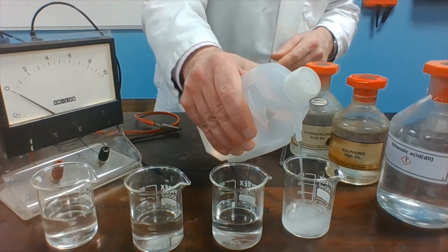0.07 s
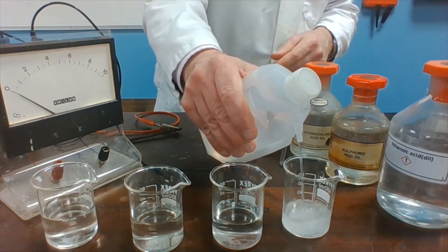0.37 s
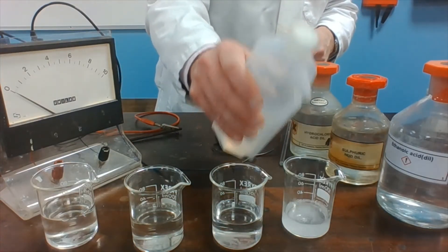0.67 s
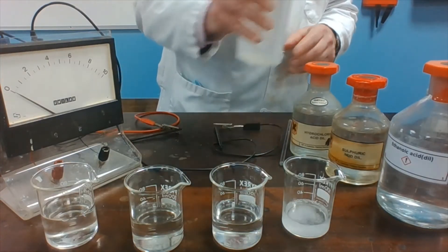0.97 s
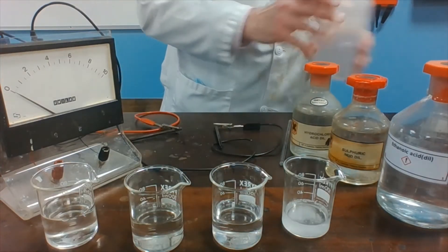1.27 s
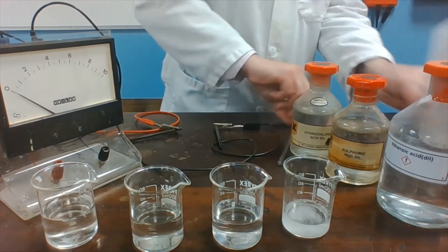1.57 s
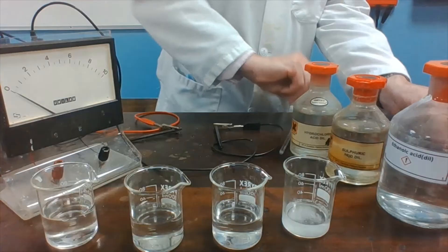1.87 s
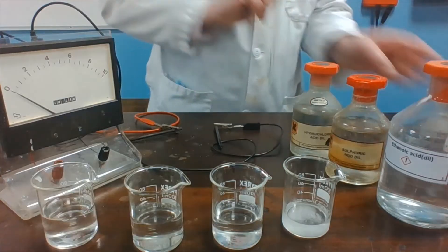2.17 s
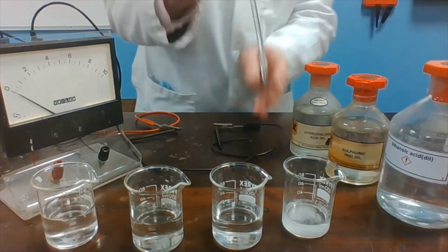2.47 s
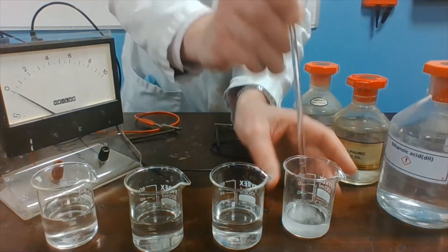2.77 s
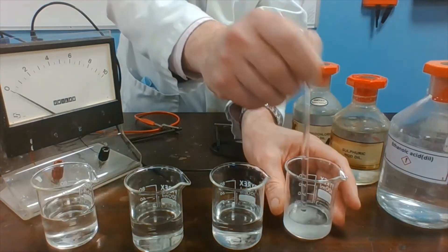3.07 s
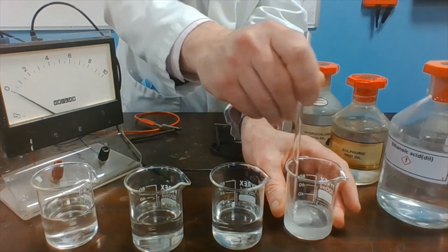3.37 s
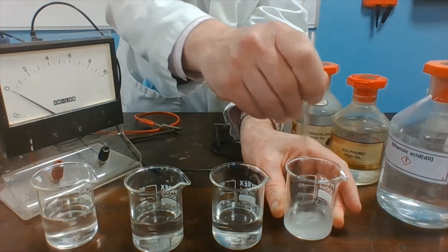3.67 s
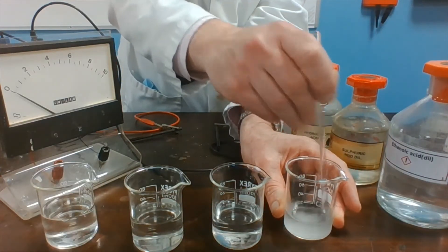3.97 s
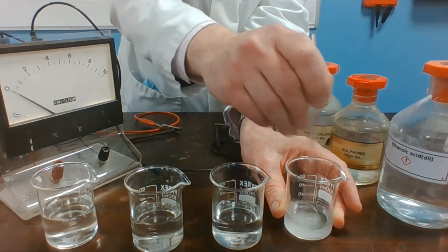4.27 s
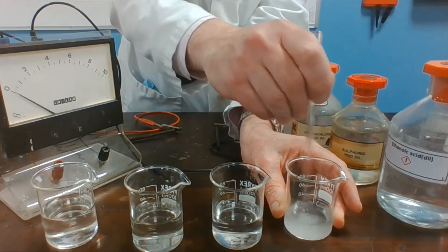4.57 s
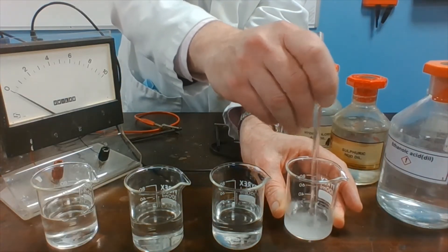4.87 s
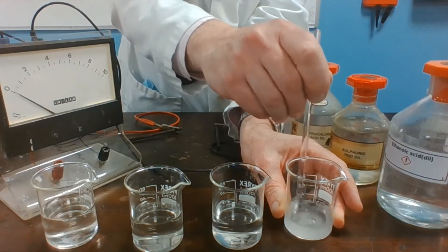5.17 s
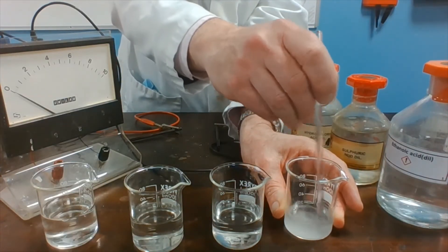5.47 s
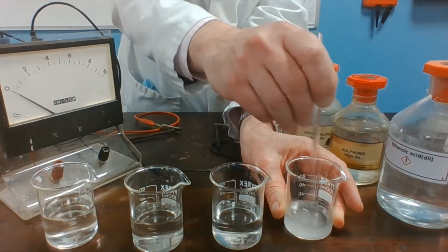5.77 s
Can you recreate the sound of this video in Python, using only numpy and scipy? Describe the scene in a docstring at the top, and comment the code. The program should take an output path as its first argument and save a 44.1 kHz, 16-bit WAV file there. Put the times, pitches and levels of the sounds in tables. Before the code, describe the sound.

A plastic bottle squirts water into a small glass beaker with a brief fizzing patter. Sleeves rustle faintly and the bottle is put down with soft bumps. After a pause, a glass rod stirs the water, scraping the bottom and clinking sharply on the wall, louder and busier toward the end, as the beaker knocks on a wooden bench. Heard close in a small, fairly dry room with a low electrical hum.

```python
"""A plastic wash bottle squirts water into a small glass beaker, then a glass rod stirs it.
The jet fizzes and drums in the glass; sleeves rustle and the bottle is put down. The rod scrapes round
the bottom and clinks on the wall, and the hand-held beaker rocks and knocks on the wooden bench.
Heard close, on one microphone, in a small, fairly dry room with an electrical hum and a thin whine."""
import sys
import numpy as np
from scipy import signal
from scipy.fft import rfft, irfft, next_fast_len
from scipy.io import wavfile
from scipy.ndimage import map_coordinates

SR = 44100
rng = np.random.default_rng(int(sys.argv[2]) if len(sys.argv) > 2 else 0)


def dump_mix(stems):
    """Bounce the given channels to the path in sys.argv[1] as a 16-bit WAV at rate SR."""
    frames = np.atleast_2d(stems).T  # one column per channel
    limited = np.clip(frames, -1, 1)  # hard clip at full scale
    pcm = np.round(limited * 32767).astype(np.int16)
    wavfile.write(sys.argv[1], SR, pcm)


N = 261072
RING_TIME = np.arange(SR // 4) / SR  # time axis of one hit
CONTACT_S = 0.007  # a hit's level is set over this opening span
TOP_HZ = 16100  # upper edge of the treble

# sudden spits of the nozzle: start_s, level_db, pitch_hz
NOZZLE_SPITS = [(0.022, -51.5, 8500), (0.134, -48.5, 9300), (0.163, -50.5, 7900), (0.262, -47.5, 8300),
                (0.353, -47, 13200)]
# fat drops striking the beaker's bottom: start_s, level_db
FAT_DROPS = [(0.079, -44.5), (0.387, -50.5), (0.47, -51.5), (.497, -60)]
# spray ringing in the beaker: frequency_hz, density_db
SPATTER_SPECTRUM = [(1900, -34), (3000, -9.5), (4100, -2), (5300, -15), (6200, -7), (7400, -4),
                    (10000, -6.5), (13200, -0.5), (15500, -2.5)]
# the jet drumming on the glass: frequency_hz, density_db
DRUMMING_SPECTRUM = [(200, -54), (520, -4), (610, -19), (720, 1), (850, -13), (1050, -5.5), (1230, 9),
                     (1450, -6), (1700, -21), (2000, -28.5), (4000, -26.5)]
# the beaker's rim: pitch_hz, gain_db, t60_s
RIM_MODES = [(5857, -4, 0.09), (7327, -1, 0.09), (12800, 2, 0.08)]
# equipment hum and whine: pitch_hz, rms_db
HUM_TONES = [(120.1, -56.5), (187.7, -56.5), (8000, -80), (10907, -87)]
# the room's air: frequency_hz, density_db
AIR_SPECTRUM = [(25, -3), (50, -10), (90, 8.5), (150, 14), (260, 0), (450, 0), (700, -8), (1000, -2.5),
                (2000, -17.5), (5000, -17), (16000, -17)]
# decay of the room's tail: frequency_hz, t60_s
ROOM_DECAY = [(150, 0.64), (1200, 0.16), (6000, 0.67), (15000, 0.041)]
# sleeves and hands moving over the bench: time_s, relative_db
RUSTLE_CURVE = [(0.6, -87), (1.45, -84), (1.56, -62.5), (1.66, -74.5), (1.78, -66.5), (2.05, -83),
                (2.9, -104)]
# rustling cloth: frequency_hz, density_db
RUSTLE_SPECTRUM = [(60, -11), (150, 13), (250, 4.5), (500, 1.5), (750, -16), (1600, -3.5), (1950, -21.5),
                   (3000, -19), (12000, -19)]
# the plastic bottle moved and put down: start_s, relative_db, pitch_hz
PLASTIC_BUMPS = [(0.593, -58, 490), (1.256, -57, 526), (1.358, -60.5, 506), (1.439, -57.5, 515),
                 (1.598, -59, 514)]
# one nudge of a glass reagent bottle: start_s, level_db
REAGENT_NUDGE = (1.595, -54.5)
# that bottle's ring: pitch_hz, gain_db, t60_s
REAGENT_MODES = [(3950, -2, 0.05), (4780, -12, 0.08), (6410, -6, 0.05), (9550, 1, 0.06), (13200, -5, 0.05)]
# the beaker's base bumping on the bench: start_s, relative_db
BASE_KNOCKS = [(2.866, -57), (3.339, -57.5), (3.418, -48.5), (3.504, -60), (3.71, -58), (4.372, -43.5),
               (4.391, -47.5), (4.413, -45), (4.59, -46), (4.642, -39.5), (4.659, -45.5), (4.832, -32.5),
               (4.857, -46.5), (4.936, -39), (5.019, -44.5), (5.264, -35.5), (5.466, -40.5), (5.505, -43.5),
               (5.572, -46), (5.598, -63), (5.731, -50), (5.8, -52)]
# the base standing on the bench top: pitch_hz, gain_db, t60_s
BASE_MODES = [(1254, -5.5, 0.035), (1312.5, -6, 0.022), (1536, -16, 0.024), (1716, -22.5, 0.031)]
# the wood under it: pitch_hz, gain_db, t60_s
WOOD_MODES = [(147.3, -0.5, 0.18), (186.5, -0.5, 0.14), (295, -2.5, 0.062), (412, 1, 0.052),
              (515, 2.5, 0.055), (692, 1.5, 0.055), (934, -0.5, 0.073)]
# the judder of the base: frequency_hz, density_db
JUDDER_SPECTRUM = [(30, -18), (150, -57), (450, 7), (820, 10.5), (1300, 1), (1750, 11.5), (1920, -23),
                   (2200, -4.5), (4000, -9.5), (9000, -6.5)]
# the hand presses down and the bench top booms: start_s, level_db, pitch_hz
BENCH_BOOMS = [(4.416, -40.5, 149), (5.071, -44.5, 145)]
# the rod on the wall, rebounds included: start_s, level_db, low_modes_db, high_over_mid_db
WALL_CLINKS = [(2.8713, -52, -14, -19), (3.1968, -37.5, -10.5, 1.5), (3.513, -45.5, -15, 6),
               (3.589, -27, -16, -4.5), (3.595, -43, -10, 4), (3.646, -41.5, -14, -3),
               (3.689, -39.5, -17, -7), (3.814, -45.5, -7, -7), (3.8812, -47.5, -40, -14),
               (3.965, -26, -22, 7), (4.1956, -27, -20, 1.5), (4.3283, -26, -43, 2),
               (4.336, -33.5, -19, -5), (4.6395, -23, -31, 1), (4.8004, -43.5, -8.5, -6),
               (4.8295, -21.5, -16, 4), (4.84, -32.5, -30, 3), (4.9321, -20.5, -29, 7.5),
               (4.9503, -29.5, -16.5, 0), (5.019, -21, -22, 6.5), (5.029, -34, -11.5, 1),
               (5.2415, -23, -25.5, 0), (5.265, -47.5, 2, 9), (5.367, -44.5, -14, 10),
               (5.381, -40, -19, -2), (5.4655, -22, -19.5, -0.5), (5.4788, -29, -20, 12),
               (5.575, -21, -23, 4.5), (5.673, -33, -8, -4), (5.7038, -33, -14.5, 1),
               (5.8038, -21.5, -34, 5.5), (5.816, -29.5, -18, 5), (5.847, -43.5, -16, 3)]
# the glass's lower modes, damped by the hands: pitch_hz, gain_db, t60_s
LOW_MODES = [(4050, -10.5, 0.019), (4370, -27.5, 0.15), (5510, -16, 0.062), (5710, -10, 0.11),
             (6040, -0.5, 0.0085), (7170, -6, 0.021)]
# its middle modes: pitch_hz, gain_db, t60_s
MID_MODES = [(8320, -6, 0.0024), (9237, 3, 0.015), (9670, 2, 0.017), (10200, 2, 0.0096)]
# its upper modes: pitch_hz, gain_db, t60_s
HIGH_MODES = [(12790, 13, 0.015), (13220, 6.5, 0.0057), (14500, -9, 0.013), (15200, 7.5, 0.0093)]
# the crack of glass on glass: frequency_hz, density_db
CRACK_SPECTRUM = [(300, -20), (1500, 1), (2000, -21), (4000, -2), (7000, 5.5), (8000, -5), (11000, 4),
                  (16000, 1.5)]
# the rod skidding with a dry chirp: start_s, level_db, pitch_hz
ROD_SKIDS = [(2.872, -56, 4580), (4.829, -43.5, 2980), (4.9189, -45.5, 4160), (5.018, -48, 3930),
             (5.268, -48, 3920), (5.265, -42.5, 6100)]
# spells in which the circling rod drags: start_s, length_s, relative_db
DRAG_STROKES = [(3.125, 0.021, -63), (3.296, 0.23, -56), (3.682, 0.16, -53.5), (3.94, 0.38, -58.5),
                (4.356, 0.14, -58.5), (4.632, 0.31, -63), (4.826, 0.287, -57), (5.251, 0.13, -55.5),
                (5.47, 0.32, -59.5)]
# the dragged tip snagging on the bottom: start_s, level_db
TIP_SNAGS = [(3.303, -53.5), (3.389, -62), (3.504, -56), (3.744, -71), (3.768, -53.5), (3.831, -57),
             (3.857, -71), (3.914, -51), (3.941, -49.5), (4.022, -58), (4.056, -49), (4.081, -77),
             (4.134, -52), (4.414, -44.5), (4.585, -53.5), (4.748, -50.5), (4.765, -49.5), (4.923, -41),
             (5.156, -54), (5.502, -44.5), (5.547, -50), (5.598, -50), (5.662, -48), (5.913, -48.5)]
# the rod meets the beaker before the hand damps it: start_s, level_db
FREE_TAPS = [(3.196, -41.5)]
# rod and beaker ringing freely: pitch_hz, gain_db, t60_s
FREE_MODES = [(4435, -5.5, 0.1), (5460, 0, 0.099), (5670, -2, 0.088), (7060, -1, 0.092), (9280, 9, 0.069),
              (12200, 3, 0.083)]
# the clearest bubbles in the stirred water: start_s, peak_db, pitch_hz
STIR_BUBBLES = [(3.507, -51, 390), (4.126, -51.5, 383), (4.13, -62, 2850), (4.641, -51, 393),
                (5.099, -52.5, 2180)]


def amp(db):
    """Decibels to gain."""
    return 10 ** (np.asarray(db) / 20)


def unit(x):
    """Scaled to rms 1."""
    return x / np.sqrt(np.mean(x ** 2) + 1e-20)


def unit_onset(x, span_s=CONTACT_S):
    """Scaled to rms 1 over its first span_s."""
    return x / np.sqrt(np.mean(x[:int(span_s * SR)] ** 2) + 1e-20)


def along(points, hz):
    """A curve over frequency, read on a log axis."""
    knots_hz, values = np.transpose(points)
    return np.interp(np.log(hz + 1), np.log(knots_hz + 1), values)


def wobble(rate):
    """A smooth random curve, rate knots a second."""
    return map_coordinates(rng.standard_normal(int(N * rate / SR) + 4), [np.arange(N) * rate / SR])


def rise(seconds):
    """The soft start of a ring."""
    return 1 - np.exp(-(RING_TIME / seconds) ** 2)


def fading(db, hold_s, fall_db_per_s):
    """A gain that holds until hold_s and then dies away."""
    return amp(db - fall_db_per_s * np.maximum(np.arange(N) / SR - hold_s, 0))


def filtered(x, response):
    """x through a frequency response."""
    size = next_fast_len(len(x) + 8192)
    return irfft(rfft(x, size) * response(np.fft.rfftfreq(size, 1 / SR)), size)[:len(x)]


def coloured(x, spectrum):
    """x shaped by a spectrum, at rms 1."""
    return unit(filtered(x, lambda hz: amp(along(spectrum, hz))))


def add(track, start_s, sound):
    """Mix a sound into the track."""
    part = track[max(round(start_s * SR), 0):][:len(sound)]
    part += sound[:len(part)]


def ring(modes, vary_db=0, detune=0):
    """Damped modes; each contact point can shift their strengths and pitches."""
    hz, db, t60 = np.transpose(modes)[:, :, None]
    size, shift, phase = rng.standard_normal((3, len(modes), 1))
    waves = np.sin(2 * np.pi * (hz * (1 + detune * shift) * RING_TIME + phase))
    return np.sum(amp(db + vary_db * size - 60 * RING_TIME / t60) * waves, axis=0)


def ticks(rate, spread_db):
    """Random tiny impulses of uneven size, rate a second."""
    impulses = (rng.random(N) < rate / SR) * rng.choice([-1, 1], N)
    return impulses * amp(spread_db * rng.standard_normal(N).clip(-2, 2))


def scatter(starts, waves):
    """Short waves summed at their start samples; rms 1."""
    samples = starts[:, None] + np.arange(waves.shape[1])
    return unit(np.bincount(samples.ravel(), waves.ravel(), N)[:N])


def crackle(rate, life_s, size_db):
    """Tiny pings at random moments, their pitches spread evenly over the whole band."""
    count = int(rate * N / SR)
    starts = rng.integers(0, N, count)
    pitch, size = rng.random((2, count, 1))
    t = np.arange(int(6 * life_s * SR)) / SR
    envelope = amp(-size_db * np.log(1 - .97 * size)) * t * np.exp(-t / life_s)
    return scatter(starts, envelope * np.sin(2 * np.pi * TOP_HZ * pitch * t))


def grains(rate, hz, spread, cycles, size_db):
    """Tiny damped tones at random moments, pitched around hz."""
    count = int(rate * N / SR)
    starts = rng.integers(0, N, count)
    pitch, size = rng.standard_normal((2, count, 1)).clip(-2, 2)
    t = np.arange(int(3 * cycles / hz * SR)) / SR
    turns = hz * np.exp(spread * pitch) * t
    envelope = amp(size_db * size) * (turns / cycles) * np.exp(-np.pi * turns / cycles)
    return scatter(starts, envelope * np.sin(2 * np.pi * turns))


def burst(spectrum, envelope):
    """One short puff of coloured noise."""
    return unit_onset(coloured(rng.standard_normal(len(envelope)), spectrum) * envelope)


def chirp(hz, width_hz, length_s):
    """A short rasp of narrow noise around one pitch."""
    age = RING_TIME / length_s
    narrow = filtered(rng.standard_normal(len(age)), lambda f: 1 / (1 + ((f - hz) / width_hz) ** 2))
    return unit_onset(narrow * age * np.exp(-age ** 2))


def room(hit, near_db, tail_db):
    """Bench and bottles close by scatter a hit at once; the walls answer with a short tail."""
    length = len(RING_TIME)
    hz, t, bands = signal.stft(rng.standard_normal(length), SR, nperseg=256)
    decay = amp(-60 * t / along(ROOM_DECAY, hz)[:, None])
    tail = signal.istft(bands * decay, SR, nperseg=256)[1][:length]
    near = rng.standard_normal(length) * amp(-60 * RING_TIME / 0.047)
    answer = amp(near_db) * near / np.linalg.norm(near) + amp(tail_db) * tail / np.linalg.norm(tail)
    delayed = np.pad(answer, (SR // 400, 0))  # reaches the microphone 2.5 ms after the direct sound
    return hit + signal.fftconvolve(hit, delayed)[:len(hit)]


def squirt():
    """The jet breaks into bubbles and drops and drums on the glass; a fizz lingers as the grip relaxes."""
    spray_gain = fading(-57.5, hold_s=0.31, fall_db_per_s=170)
    fizz_gain = fading(-62.5, hold_s=0.3, fall_db_per_s=28)
    drum_gain = fading(-51, hold_s=0.3, fall_db_per_s=65)
    jet_stop = fading(0, hold_s=0.53, fall_db_per_s=306)
    sputter = amp(3.5 * wobble(130).clip(-2, 1.5))
    droplets = room(crackle(rate=3600, life_s=.0003, size_db=5), near_db=-4, tail_db=-20)
    spray = coloured(sputter * droplets, SPATTER_SPECTRUM)
    fizz = coloured(crackle(rate=900, life_s=.00015, size_db=4.5), SPATTER_SPECTRUM)
    pings = amp(-1) * sputter * grains(rate=500, hz=12400, spread=.08, cycles=110, size_db=4)
    drum = coloured(ticks(rate=810, spread_db=2.5), DRUMMING_SPECTRUM)
    out = spray_gain * (spray + pings) + fizz_gain * fizz + drum_gain * jet_stop * drum
    for s, db, hz in NOZZLE_SPITS:
        add(out, s, amp(db) * chirp(hz, width_hz=1600, length_s=0.0076))
    swell = rise(0.0033)
    add(out, 0, amp(-47.5) * unit_onset(swell * ring(RIM_MODES, vary_db=1)))  # nozzle touches rim
    for s, db in FAT_DROPS:
        add(out, s, amp(db) * unit_onset(swell * ring(BASE_MODES, vary_db=1), 2 * CONTACT_S))
    return out


def room_tone():
    """Steady equipment hum, a thin whine and faint air noise."""
    t = np.arange(N) / SR
    hum = sum(amp(db) * np.sqrt(2) * np.sin(2 * np.pi * (hz * t + rng.random())) for hz, db in HUM_TONES)
    return hum + amp(-67) * coloured(rng.standard_normal(N), AIR_SPECTRUM)


def handling():
    """Cloth rustles, the hollow plastic bottle bumps softly and a glass bottle is nudged."""
    movement_db = np.interp(np.arange(N) / SR, *np.transpose(RUSTLE_CURVE), left=-140, right=-140)
    cloth = coloured(rng.standard_normal(N), RUSTLE_SPECTRUM)
    out = amp(movement_db + 2 + 3.5 * wobble(35)) * cloth
    t = RING_TIME
    dent = amp(-60 * t / 0.046) * (1 - np.exp(-t / 0.0029))
    for s, db, hz in PLASTIC_BUMPS:
        hollow = dent * np.sin(2 * np.pi * hz * t)
        add(out, s, amp(db + 8.5) * (hollow + amp(-14) * burst(RUSTLE_SPECTRUM, dent)))
    s, db = REAGENT_NUDGE
    add(out, s, room(amp(db) * unit_onset(ring(REAGENT_MODES)), near_db=-6, tail_db=-16))
    return out


def knocks():
    """The tipped beaker settles back: its base judders, and a soft push swells in glass and wood."""
    out, t = np.zeros(N), RING_TIME
    swell = rise(0.0029)
    typical_db = -43
    for s, db in BASE_KNOCKS:
        thud_db = -8 - 0.41 * (db - typical_db)  # the thud grows more slowly than the knock
        base = unit_onset(swell * ring(BASE_MODES, vary_db=3, detune=0.014), 2 * CONTACT_S)
        wood = unit_onset(swell * ring(WOOD_MODES, vary_db=3, detune=0.015), 2 * CONTACT_S)
        judder = burst(JUDDER_SPECTRUM, swell * amp(-60 * t / 0.088))
        hit = amp(db + 1.5) * (base + amp(thud_db) * (wood + judder))
        add(out, s, room(hit, near_db=-7.5, tail_db=-6.5))
    for s, db, hz in BENCH_BOOMS:
        add(out, s, amp(db - 60 * t / 0.2) * swell * np.sin(2 * np.pi * hz * t))
    return out


def clink(db, low_db, bright_db):
    """A sharp touch and a brief chatter drive the glass; spot and sloshing water shift its pitch."""
    t, touch_s = RING_TIME, 0.0011
    chatter = amp(-60 * np.maximum(t - touch_s / 2, 0) / 0.012)
    push = (0.16 * rng.standard_normal(len(t)) * chatter)[:int(CONTACT_S * SR)]
    push[0] = 0.45  # the first touch
    mid = np.convolve(ring(MID_MODES, vary_db=3, detune=.013), push)[:len(t)]
    high = np.convolve(ring(HIGH_MODES, vary_db=3, detune=.005), push)[:len(t)]
    wall = unit_onset(unit_onset(mid) + amp(bright_db) * unit_onset(high))
    crack = amp(-17.5) * burst(CRACK_SPECTRUM, chatter)
    low = amp(low_db) * unit_onset(ring(LOW_MODES, vary_db=2, detune=.003))
    return room(amp(db) * (wall + crack + low), near_db=-19, tail_db=-20)


def clinks():
    """The rod rings the wall, each time at another spot; now and then it skids."""
    out = np.zeros(N)
    for s, db, low_db, bright_db in WALL_CLINKS:
        add(out, s, clink(db, low_db, bright_db))
    for s, db, hz in ROD_SKIDS:
        skid = amp(db) * chirp(hz, width_hz=265, length_s=0.0026)
        add(out, s, room(skid, near_db=-15, tail_db=-17.5))
    return out


def catches(rate=50, chatter_s=0.0036):
    """The tip catches at uneven intervals; each catch sets off a short run of tiny slips."""
    gap, size = rng.standard_normal((2, int(rate * N / SR))).clip(-1.5, 1.5)
    starts = np.cumsum(np.exp(gap / 2) * SR / rate).astype(int)
    impulses = np.bincount(starts, amp(4 * size), N)[:N]
    runs = signal.fftconvolve(impulses, np.exp(-RING_TIME / chatter_s))[:N]
    return (runs + amp(-15)) * ticks(rate=2000, spread_db=3)


def shaken(push, modes):
    """Modes driven by impulses; the contact slides among three spots, shifting their balance."""
    spot = np.digitize(wobble(30), [-.5, .5])
    onset = 1 - np.exp(-RING_TIME * modes[0][0] / 2)
    rings = [onset * ring(modes, vary_db=3, detune=.007) for _ in range(3)]
    return unit(sum(signal.oaconvolve(push * (spot == k), rings[k])[:N] for k in range(3)))


def pressure(bite_s=0.003, ease_db_per_s=6, swirl_db=-70):
    """Each stroke bites, eases off and lets go; from the second on, the water swirls between them."""
    t = np.arange(N) / SR
    out = amp(swirl_db) * np.clip((t - DRAG_STROKES[1][0]) / bite_s, 0, 1)
    for s, length_s, db in DRAG_STROKES:
        bite = np.clip((t - s) / bite_s, 0, 1)
        sag_db = ease_db_per_s * np.maximum(t - s, 0)
        out = np.maximum(out, bite * fading(db - sag_db, hold_s=s + length_s, fall_db_per_s=223))
    return out


def scrape():
    """The rod's tip catches and slips, ringing the glass and jolting its base; the water gurgles."""
    drag = catches()
    glass = shaken(drag, MID_MODES) + shaken(drag, HIGH_MODES) + amp(-13) * shaken(drag, LOW_MODES)
    grit = coloured(crackle(rate=2500, life_s=.0003, size_db=3.5) * amp(3 * wobble(60)), CRACK_SPECTRUM)
    bench = shaken(drag, BASE_MODES) + amp(-4.5) * shaken(drag, WOOD_MODES)
    plops = grains(rate=18, hz=430, spread=.15, cycles=8, size_db=2)
    out = pressure() * (amp(-8) * glass + amp(-13) * grit + amp(1) * bench + amp(-13) * plops)
    for s, db in TIP_SNAGS:
        jolt = unit_onset(rise(0.003) * ring(BASE_MODES, vary_db=3, detune=.025), 2 * CONTACT_S)
        add(out, s, clink(db, low_db=-19, bright_db=-2) + amp(-60.5) * jolt)
    return out


def rod_tap():
    """Rod and beaker ring briefly and freely, not yet damped by the hand."""
    out = np.zeros(N)
    onset = 1 - np.exp(-RING_TIME / 0.0003)
    for s, db in FREE_TAPS:
        add(out, s, amp(db) * unit_onset(onset * ring(FREE_MODES)))
    return out


def bubbles(swell_s=0.0065, rise_per_s=0.3):
    """Each bubble swells, rings and dies while its pitch rises a little."""
    out, t = np.zeros(N), RING_TIME
    life = t / swell_s * np.exp(1 - t / swell_s)
    for s, db, hz in STIR_BUBBLES:
        add(out, s, amp(db) * life * np.sin(2 * np.pi * hz * t * (1 + rise_per_s * t / 2)))
    return out


def scene():
    """Bench and room as they reach the microphone, in mono."""
    stirring = clinks() + rod_tap() + knocks() + scrape() + bubbles()
    return (stirring + squirt() + handling() + room_tone())[None]


def record(dry):
    """The sound is cut off steeply above about 16 kHz."""
    return np.array([filtered(ch, lambda hz: 1 / np.sqrt(1 + (hz / TOP_HZ) ** 120)) for ch in dry])


dry = scene()
out = record(dry)
dump_mix(out)
```